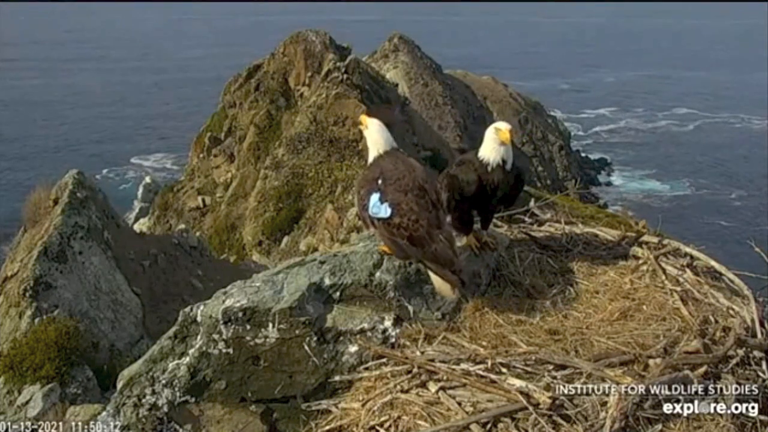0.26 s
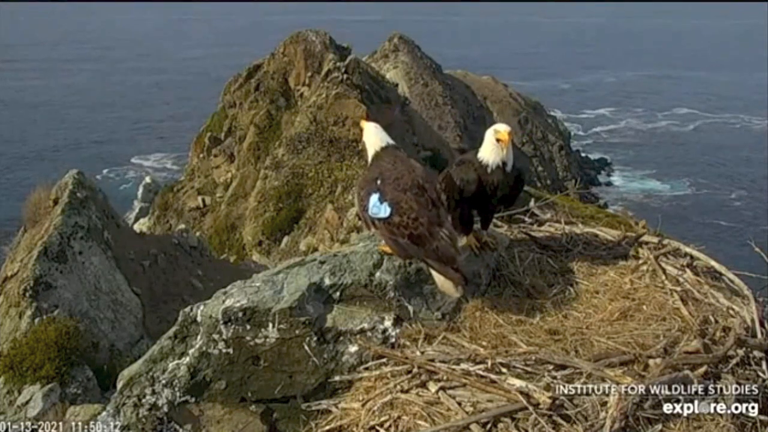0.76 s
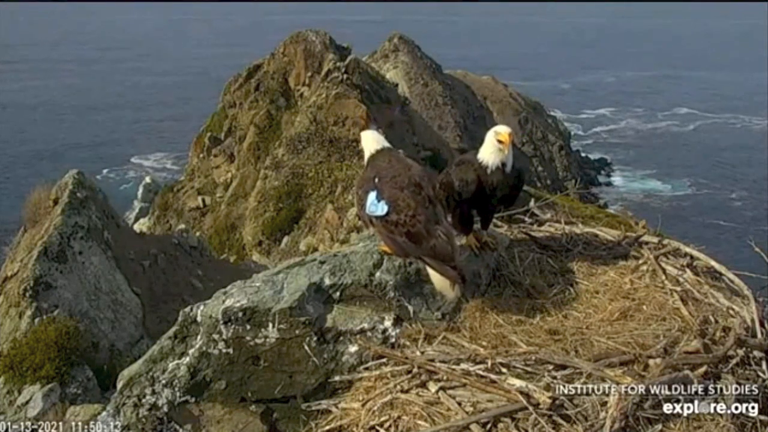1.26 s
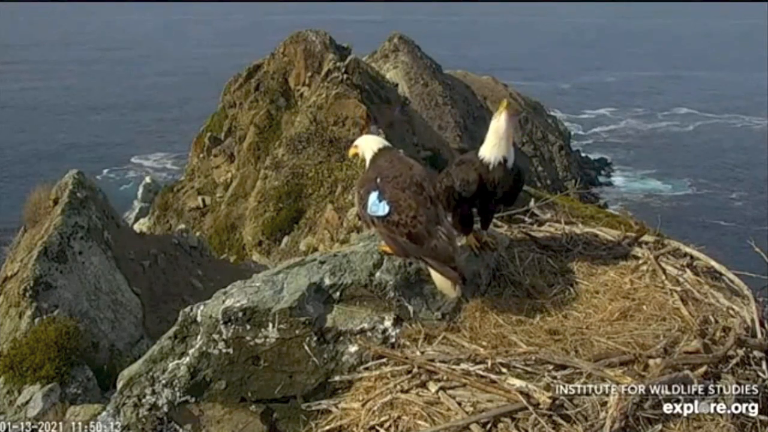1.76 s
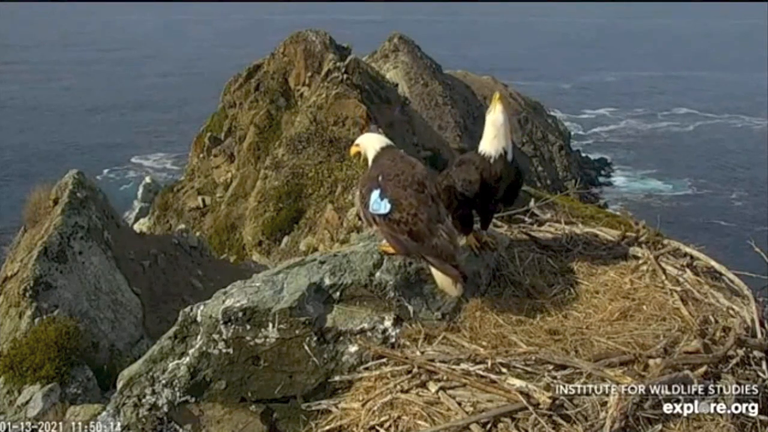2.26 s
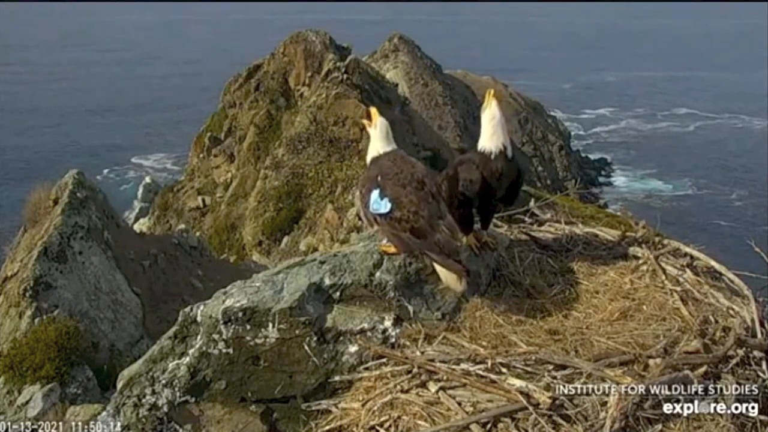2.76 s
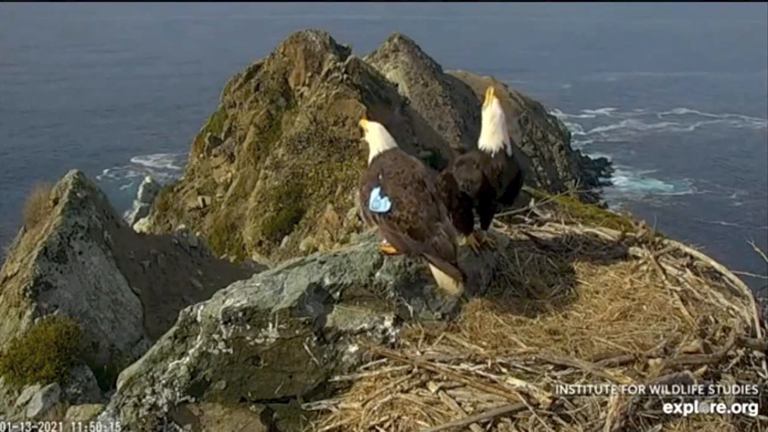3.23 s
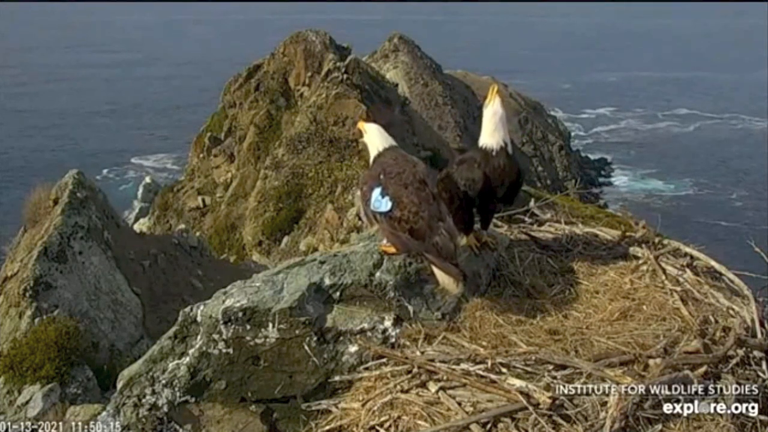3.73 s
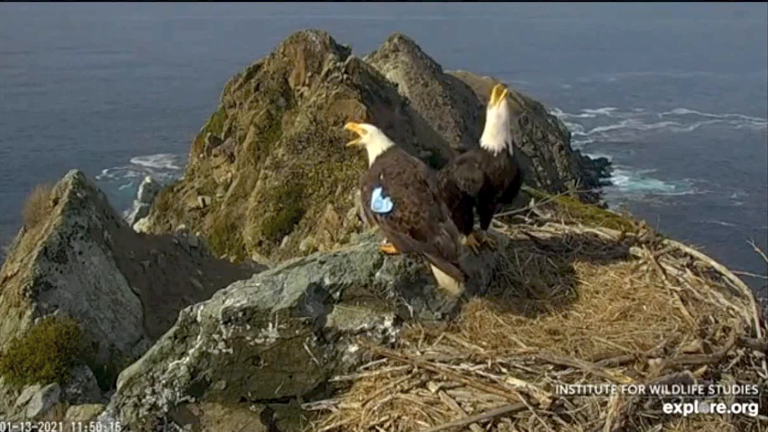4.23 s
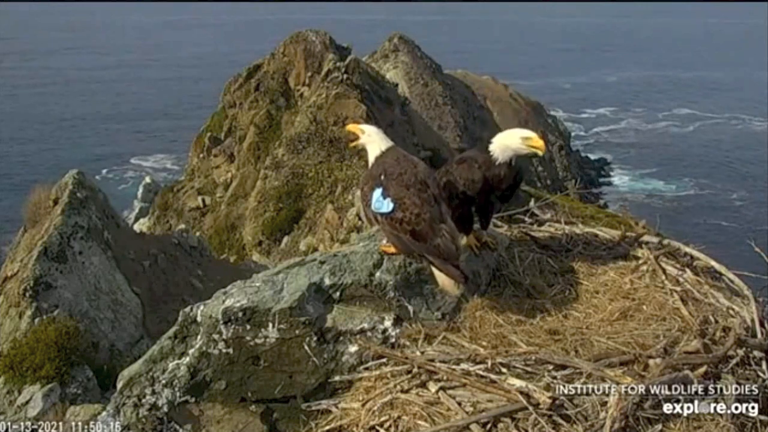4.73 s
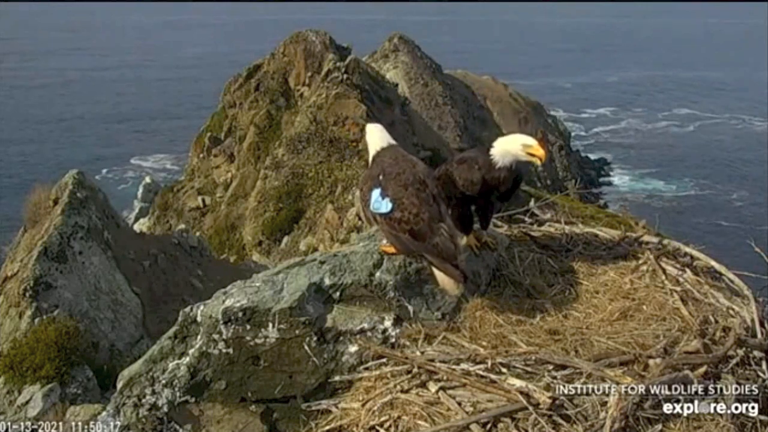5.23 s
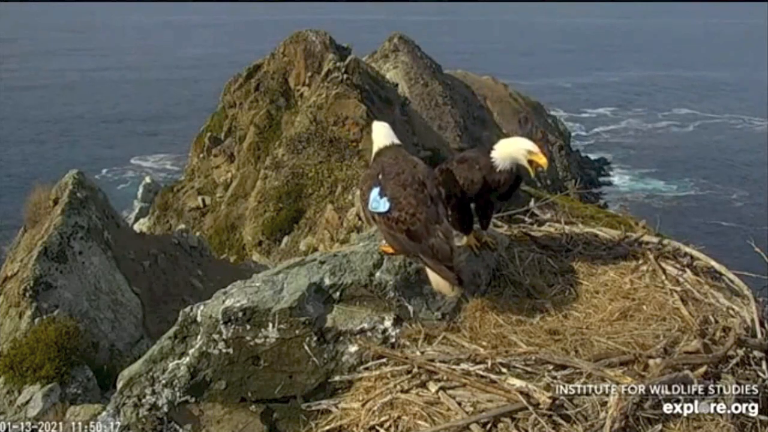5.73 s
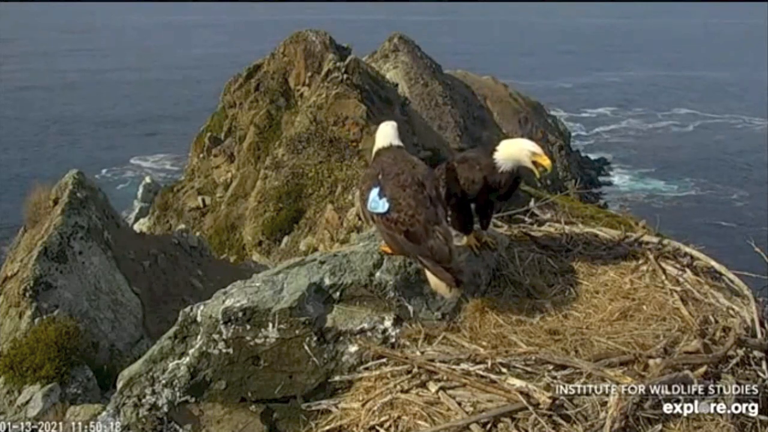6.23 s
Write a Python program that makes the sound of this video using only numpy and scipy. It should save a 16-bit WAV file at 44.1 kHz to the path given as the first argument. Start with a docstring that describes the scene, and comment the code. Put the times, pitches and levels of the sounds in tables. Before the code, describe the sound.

Outdoors on a sea cliff, two eagles call in turn near a fixed microphone. The first is almost dry: short quavering screams and weak chips. The second has more rock echo: evenly spaced yelps turning into whistles and squeaks. After a small lull comes the loudest moment, a cracked squeal and two sharp shrieks, trailing into falling chatter and faint pips. Constant faint hiss, muffled sea and hum lie beneath.

```python
"""Eagles at a cliff nest

Two eagles call. The one on a rock screams thinly, pips and shrieks twice; the one in the nest yelps,
whistles, squeaks and chatters with more echo. Each call is a sum of sine partials shaken in pitch and
strength by slow noise, then passed through cliff echoes. Under them lie shaped noise for distant sea
and microphone hiss, and the nest camera's 120 Hz hum with a low rumble."""
import sys
import numpy as np
from scipy import signal
from scipy.fft import rfft, irfft
from scipy.io import wavfile

SR = 44100
rng = np.random.default_rng(int(sys.argv[2]) if len(sys.argv) > 2 else 0)


def generate_wav(sig):
    """Save sig (samples, or channels by samples) to the path in sys.argv[1] as 16-bit PCM at SR."""
    pcm = np.round(np.clip(np.atleast_2d(sig).T, -1, 1) * 32767).astype(np.int16)
    wavfile.write(sys.argv[1], SR, pcm)


N = 286076


# All call levels are relative: call gain, trim, echoes and stereo lean follow.
# Screams: (time [s], fundamental pitch [Hz], second partial level [dB], third partial level [dB])
LONG_SCREAM = [(0.535, 1077, -39, -47), (0.555, 1220, -53, -27), (0.577, 1218, -38, -31),
               (0.673, 1233, -38, -31), (0.707, 1240, -30, -38), (0.729, 1261, -38, -35),
               (0.741, 1247, -38, -49), (0.767, 1297, -40, -37), (0.809, 1320, -30, -36),
               (0.828, 1311, -39, -49)]
ARCHED_SCREAM = [(1.17, 1185, -55, -48), (1.186, 1246, -40, -44), (1.206, 1283, -44, -48),
                 (1.218, 1321, -33, -36), (1.246, 1339, -36, -47), (1.258, 1373, -46, -41),
                 (1.28, 1377, -38, -38), (1.32, 1323, -44, -48)]
SHORT_SCREAM = [(1.62, 1200, -54, -45), (1.632, 1243, -40, -51), (1.642, 1307, -29, -36),
                (1.66, 1318, -31, -50), (1.685, 1293, -39, -47)]
# Thin pips: (peak time [s], length [s], pitch [Hz], level [dB])
PIPS = [(1.461, .032, 3740, -40), (1.582, .03, 3600, -29), (1.757, .05, 3740, -34.5),
        (3.382, .029, 3670, -31), (3.492, .04, 3600, -29.5), (4.391, .017, 3650, -37),
        (4.825, .015, 3650, -31.5), (4.838, .015, 3650, -22.5), (4.855, .03, 3590, -30.5),
        (4.959, .031, 3670, -27.3), (5.058, .035, 3570, -33.5), (6.306, .042, 3630, -32),
        (6.432, .028, 3610, -36)]
# Hoarse falling chips; the first is a faint tone at the sum of the scream's and the squeal's pitches, heard
# where the scream breaks into the squeal: (peak time [s], length [s], pitch [Hz], level [dB])
CHIPS = [(.815, .03, 3200, -34), (.89, .06, 1740, -38.5), (1.716, .03, 2860, -37),
         (1.751, .037, 3140, -35.5), (1.871, .033, 2700, -36.5), (6.246, .038, 2040, -37.5)]
# Squeal that cracks: (start [s], swell [s], fade [s], pitch [Hz], level [dB], octave over fundamental [dB],
# crack start [s], crack length [s], crack pitch [Hz], crack level [dB])
ROCK_SQUEAL = (.805, .034, .036, 1868, -25, 1, .860, .021, 1815, -22)
# Loud shrieks: (onset [s], onset to peak [s], length [s], pitch [Hz], bend over length [%], level [dB],
# swell rate [dB/ms], fade rate [dB/ms])
SHRIEKS = [(5.672, .025, .066, 3562, -3, -11.8, .3, .55), (5.781, .0125, .032, 3625, 4.5, -9.7, 1.5, .9)]


def perched_bird(tremor):
    """Three screams, the first breaking upward into a squeal; pips and chips among and after them,
    and two loud shrieks."""
    out = series(PIPS, tremor, swell_share=.36, first_pct=1.2, last_pct=-3.6, octave_db=-30,
                 rough=.3, fade_curve=1.4)
    out += series(CHIPS, tremor, swell_share=.4, first_pct=3, last_pct=-3, octave_db=-25, rough=.34)
    add(out, *scream(LONG_SCREAM, tremor, rough=.07, gain_db=1.1, fundamental_db=-9.5))
    add(out, *scream(ARCHED_SCREAM, tremor, rough=.35, gain_db=3.5, fundamental_db=-6.5))
    add(out, *scream(SHORT_SCREAM, tremor, rough=.15, gain_db=2, fundamental_db=-12))
    out += squeal(ROCK_SQUEAL, tremor, rough=.06, swell_curve=1.2)
    for row in SHRIEKS:
        add(out, *shriek(row, tremor))
    return out


# Rasping yelps: (peak time [s], level [dB])
YELPS = [(2.030, -29.5), (2.381, -30), (2.724, -30.5), (3.049, -30), (3.351, -31.5), (4.009, -31.5),
         (4.335, -32.5)]
# Clean rising whistles: (peak time [s], length [s], pitch [Hz], level [dB])
WHISTLES = [(3.052, .036, 3010, -35.5), (3.356, .032, 2985, -28.5), (3.6635, .044, 2930, -25),
            (4.016, .038, 2990, -27.5), (4.342, .035, 2995, -28)]
# Very high squeaks: (peak time [s], length [s], pitch [Hz], level [dB])
SQUEAKS = [(2.966, .055, 5820, -35.5), (3.154, .026, 6000, -40), (4.385, .028, 6130, -35),
           (4.432, .026, 5880, -37), (4.505, .059, 6000, -36.5), (4.608, .028, 5915, -24),
           (4.721, .033, 5780, -32.5)]
# Sinking chatter: (peak time [s], length [s], pitch [Hz], level [dB])
CHATTER = [(5.817, .033, 2885, -24.5), (5.913, .044, 2868, -22), (6.024, .035, 2845, -27.3),
           (6.144, .062, 2755, -35)]
# Squeal that cracks: (start [s], swell [s], fade [s], pitch [Hz], level [dB], octave over fundamental [dB],
# crack start [s], crack length [s], crack pitch [Hz], crack level [dB])
NEST_SQUEAL = (5.569, .031, .017, 2838, -20.3, -7, 5.624, .034, 2650, -31.5)


def nesting_bird(tremor, yelp_s=.052, yelp_hz=2615):
    """Yelps about three a second, later joined by whistles and very high squeaks; a squeal and a
    sinking chatter come last."""
    yelps = [(peak_s, yelp_s, yelp_hz, level_db) for peak_s, level_db in YELPS]
    out = series(yelps, tremor, swell_share=.46, first_pct=-5, last_pct=.5, octave_db=-28, rough=.52)
    out += series(WHISTLES, tremor, swell_share=.24, first_pct=-2.8, last_pct=4, octave_db=-17,
                  rough=.13, swell_curve=1.0)
    out += series(SQUEAKS, tremor, swell_share=.28, first_pct=1.1, last_pct=-1.2, octave_db=-30, rough=.39)
    out += series(CHATTER, tremor, swell_share=.34, first_pct=1.6, last_pct=-1.5, octave_db=-11,
                  rough=.28, swell_curve=.75)
    return out + squeal(NEST_SQUEAL, tremor, rough=.08, swell_curve=.55)


def scream(rows, tremor, rough, gain_db, fundamental_db, edge_s=.005, fourth_db=-31, fifth_db=-22):
    """A drawn-out call in the low register, carried by its second and third partials."""
    s, *columns = np.transpose(rows)
    t = np.arange(s[0], s[-1], 1 / SR)
    hz, second_db, third_db = (np.interp(t, s, column) for column in columns)
    phase, strength = syrinx(t, hz, rough, tremor)
    # fundamental is set against the second partial, fourth and fifth against the third
    partials_db = [second_db + fundamental_db, second_db, third_db, third_db + fourth_db, third_db + fifth_db]
    tone = sum(amp(db + gain_db) * np.sin(k * phase) for k, db in enumerate(partials_db, 1))
    return s[0], gate(t, edge_s) * strength * tone


def shriek(row, tremor, rough=.13, octave_db=-42, edge_s=.005, dive_s=.009, dive_share=.2, dive_db=-19):
    """The pitch dives faintly onto the note, which bursts open, swells to its peak and dies away."""
    s, swell_s, length_s, hz, bend_pct, level_db, swell_db_per_ms, fade_db_per_ms = row
    t = np.arange(-dive_s, length_s, 1 / SR)
    dive = dive_share * np.minimum(t / dive_s, 0) ** 2
    bend = bend_pct / 100 * (t - swell_s) / length_s
    phase, strength = syrinx(s + t, hz * (1 + dive + bend), rough, tremor)
    from_peak_ms = 1000 * (t - swell_s)
    push = amp(np.minimum(swell_db_per_ms * from_peak_ms, -fade_db_per_ms * from_peak_ms))
    burst = push * np.clip(t / edge_s, 0, 1)
    push = np.maximum(burst, amp(dive_db)) * gate(t, edge_s)
    tone = np.sin(phase) + amp(octave_db) * np.sin(2 * phase)
    return s + t[0], amp(level_db) * push * strength * tone


def squeal(row, tremor, rough, swell_curve, sag_share=.012, slide_share=.05,
           crack_swell_share=.36, crack_octave_db=-6):
    """A held note that sags slightly, cracks to a lower pitch and slides down."""
    s, swell_s, fade_s, hz, level_db, octave_db, crack_s, crack_length_s, low_hz, low_db = row
    out = np.zeros(N)
    held = s, swell_s, fade_s, hz, hz, hz * (1 - sag_share), level_db, octave_db, rough
    add(out, *note(held, tremor, swell_curve, fade_curve=1.2))
    rise_s = crack_length_s * crack_swell_share
    slide_hz = low_hz * (1 + slide_share), low_hz, low_hz * (1 - slide_share)
    crack = crack_s, rise_s, crack_length_s - rise_s, *slide_hz, low_db, octave_db + crack_octave_db, rough
    add(out, *note(crack, tremor, swell_curve=1.2, fade_curve=1.4))
    return out


def series(rows, tremor, swell_share, first_pct, last_pct, octave_db, rough, swell_curve=1.1, fade_curve=1.2,
           rough_at_db=-32, rough_doubles_db=12):
    """Notes of one kind share envelope and bend, first_pct to last_pct off pitch; weak ones are rougher."""
    out = np.zeros(N)
    for peak_s, length_s, hz, level_db in rows:
        swell_s = length_s * swell_share
        first_hz = hz * (1 + first_pct / 100)
        last_hz = hz * (1 + last_pct / 100)
        roughness = min(rough * 2 ** ((rough_at_db - level_db) / rough_doubles_db), 1)
        row = (peak_s - swell_s, swell_s, length_s - swell_s, first_hz, hz, last_hz,
               level_db, octave_db, roughness)
        add(out, *note(row, tremor, swell_curve, fade_curve))
    return out


def note(row, tremor, swell_curve, fade_curve, third_db=-20, beat_hz=162, second_db=9):
    """One push of air: a near-pure whistle that swells, bends and fades."""
    s, swell_s, fade_s, first_hz, mid_hz, last_hz, level_db, octave_db, rough = row
    t = np.arange(0, swell_s + fade_s, 1 / SR)
    stage = np.interp(t, [0, swell_s, swell_s + fade_s], [0, 1, 2])  # 1 at the peak
    hz = np.interp(stage, [0, 1, 2], [first_hz, mid_hz, last_hz])
    phase, strength = syrinx(s + t, hz, rough, tremor)
    push = abs(np.sin(np.pi * stage / 2)) ** np.where(stage < 1, swell_curve, fade_curve)
    tone = np.sin(phase) + amp(octave_db) * np.sin(2 * phase) + amp(octave_db + third_db) * np.sin(3 * phase)
    # with roughness the other side of the syrinx joins in, beat_hz lower, and beats with the first
    second = min(amp(second_db) * rough ** 2, 1) * push
    lower_side = np.sin(phase - 2 * np.pi * beat_hz * t)
    tone = (tone + second * lower_side) / np.hypot(1, second)
    return s, amp(level_db) * strength * push * tone


def syrinx(t, hz, rough, tremor, jitter=.025, shimmer=.62):
    """Phase and strength of the vibrating membranes; roughness shakes both."""
    bend, flutter = tremor[:, np.clip((t * SR).astype(int), 0, N - 1)]
    phase = 2 * np.pi * np.cumsum(hz * (1 + jitter * rough * bend)) / SR
    depth = shimmer * rough
    return phase, np.sqrt(2) * np.exp(depth * flutter - depth ** 2)


def cliff(x, echoes, scatter_db, t60_s):
    """The direct call, a few echoes from rock faces and a short scatter from rough stone."""
    t = np.arange(SR // 2) / SR
    scatter = rng.standard_normal(len(t)) * amp(-60 * t / t60_s) * (t > .006)
    response = amp(scatter_db) * scatter / np.linalg.norm(scatter)
    response[0] = 1
    for delay_s, db in echoes:
        add(response, delay_s, amp([db]))
    return signal.fftconvolve(x, response)[:N]


# Echoes of the perched bird: (delay [s], level over direct [dB])
ROCK_ECHOES = [(.0143, -16.5), (.0215, -13.5), (.036, -25)]
# Echoes of the nesting bird: (delay [s], level over direct [dB])
NEST_ECHOES = [(.0085, -13.5), (0.0174, -13), (.027, -12.5), (.042, -19), (.058, -26)]


def eagles(perched_db=-.5, nesting_db=-1):
    """The perched bird is heard almost dry; the one in the nest calls skyward and echoes more."""
    tremor = np.array([wander(140), wander(120)])
    perched = cliff(perched_bird(tremor), ROCK_ECHOES, scatter_db=-15, t60_s=.32)
    nesting = cliff(nesting_bird(tremor), NEST_ECHOES, scatter_db=-13, t60_s=.27)
    return amp(perched_db) * perched + amp(nesting_db) * nesting


# Rumble spectrum: (frequency [Hz], relative density [dB])
RUMBLE = [(20, -34), (35, -18), (50, 1), (65, -8), (90, 6.5), (140, 4.5), (180, -6), (260, -51)]


def hum(hz=120, level_db=-41.5, waver_hz=.13, waver_db=.25, rumble_db=-51):
    """The camera's steady hum, wavering very slightly, over a low rumble."""
    phase = 2 * np.pi * np.cumsum(hz + waver_hz * wander(11.2)) / SR
    tone = amp(level_db + waver_db * wander(12)) * np.sqrt(2) * np.sin(phase)
    return tone + amp(rumble_db) * noise(RUMBLE)


# Sea and hiss spectrum: (frequency [Hz], relative density [dB])
FLOOR = [(100, -28), (170, -2.5), (369, -2), (508, -2.5), (569, -3.5), (650, -3.5), (1230, -4),
         (1550, -5.5), (2300, -7), (3300, -5.5), (3620, -8), (9670, -8), (15500, -9)]
# Stereo lean, negatives played as 0: (frequency [Hz], right over left [dB])
LEAN = [(100, 1.5), (650, 1.24), (1000, -0.1), (4000, -0.28), (15000, -0.03)]


def wash(sides, level_db=-34.5):
    """Far sea below and microphone hiss above: shaped noise, leaning right in the lows."""
    mono = amp(level_db) * noise(FLOOR)
    lean_db = np.maximum(read(LEAN), 0)
    return irfft(rfft(mono) * amp(sides * lean_db), N)


def amp(db):
    """Decibels to gain."""
    return 10 ** (np.asarray(db) / 20)


def unit(x):
    """Scales to rms 1."""
    return x / np.sqrt(np.mean(x ** 2) + 1e-20)


def add(mix, s, sound):
    """Lays a sound into the mix at time s."""
    part = mix[round(s * SR):][:len(sound)]
    part += sound[:len(part)]


def gate(t, edge_s):
    """Opens at the start of t and closes at its end."""
    return np.clip(np.minimum(t - t[0], t[-1] - t) / edge_s, 0, 1)


def read(points):
    """A table of (frequency [Hz], value) spread over all frequencies, on a log axis."""
    hz, value = np.transpose(points)
    return np.interp(np.log(np.fft.rfftfreq(N, 1 / SR) + 1), np.log(hz), value)


def noise(spectrum):
    """Noise of rms 1 with the given spectrum."""
    return unit(irfft(rfft(rng.standard_normal(N)) * amp(read(spectrum)), N))


def wander(hz):
    """Smooth random drift of rms 1: noise under a Gaussian low-pass of width hz."""
    low_pass = np.exp(-(np.fft.rfftfreq(N, 1 / SR) / hz) ** 2)
    return unit(irfft(rfft(rng.standard_normal(N)) * low_pass, N))


def scene(call_lean_db=1.35, hum_lean_db=1.46):
    """Nearly mono; calls, hum and sea lean a little to the right."""
    sides = np.array([[-.5], [.5]])  # left, right
    calls = eagles() * amp(sides * call_lean_db)
    return calls + hum() * amp(sides * hum_lean_db) + wash(sides)


def record(dry, edge_hz=15750):
    """The camera's band limit: a steep linear-phase low-pass."""
    low_pass = signal.firwin(1023, edge_hz, window=("kaiser", 10), fs=SR)
    return signal.oaconvolve(dry, low_pass[None], "same", axes=1)


dry = scene()
out = record(dry)
generate_wav(out)
```